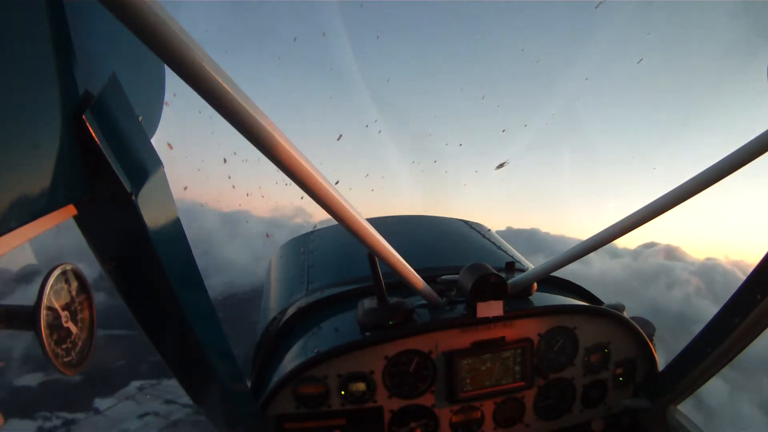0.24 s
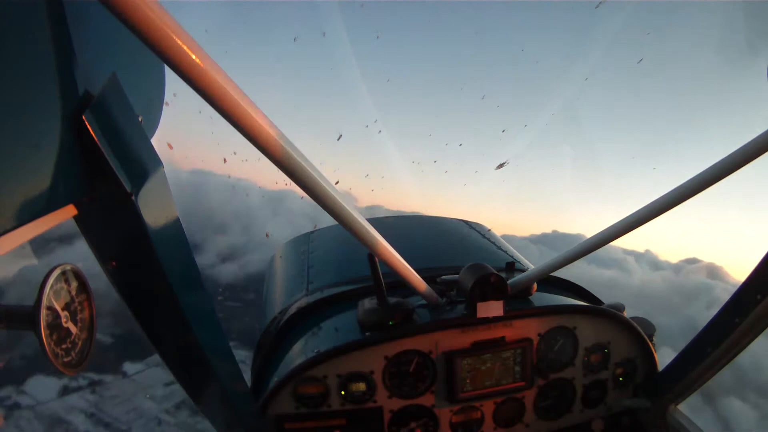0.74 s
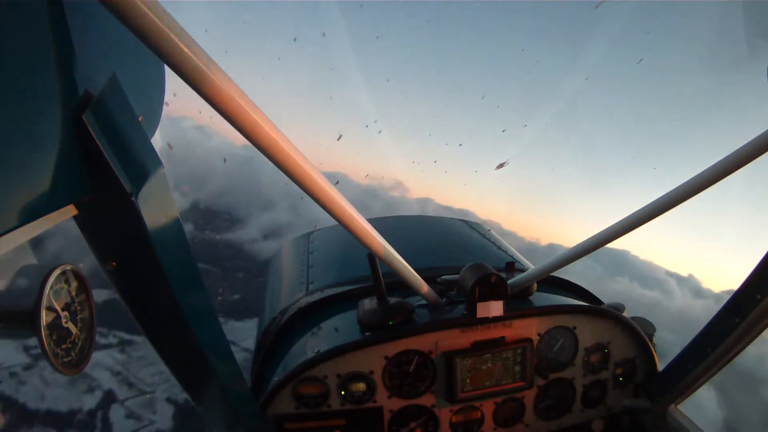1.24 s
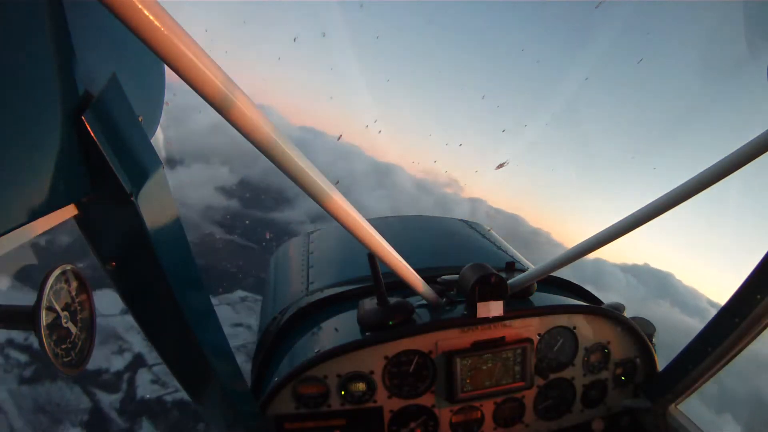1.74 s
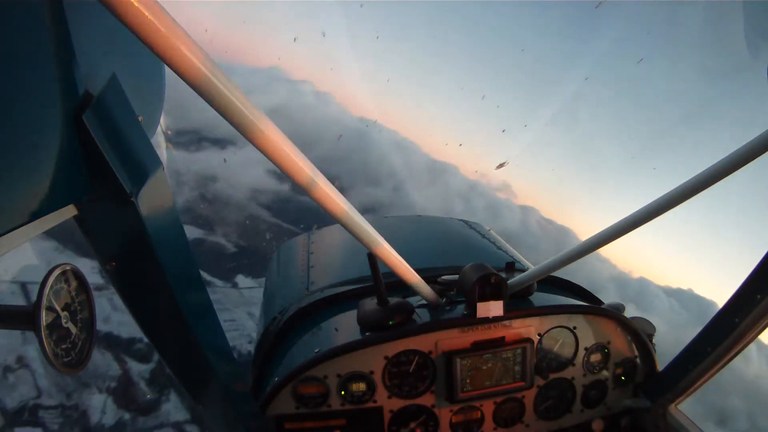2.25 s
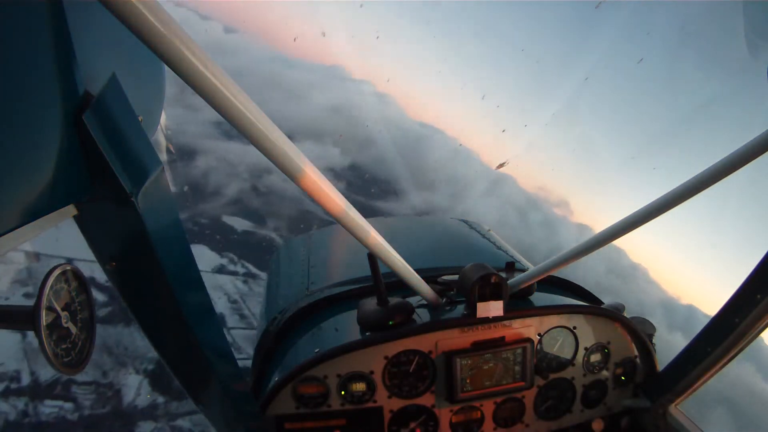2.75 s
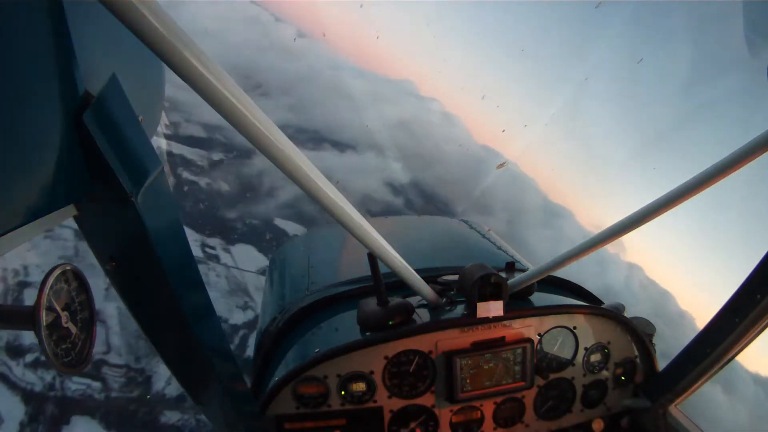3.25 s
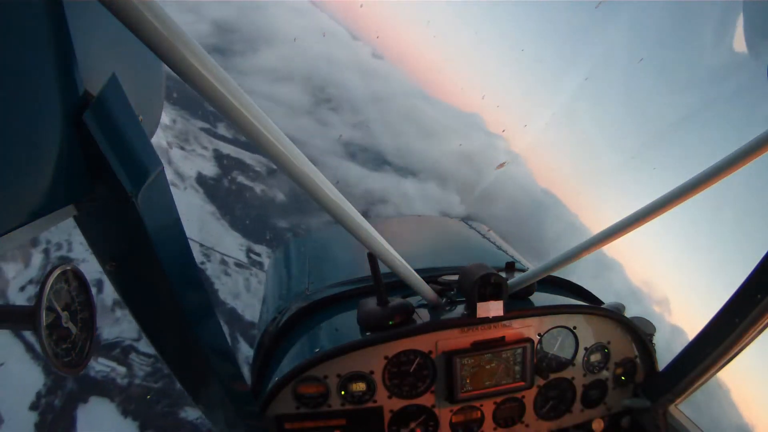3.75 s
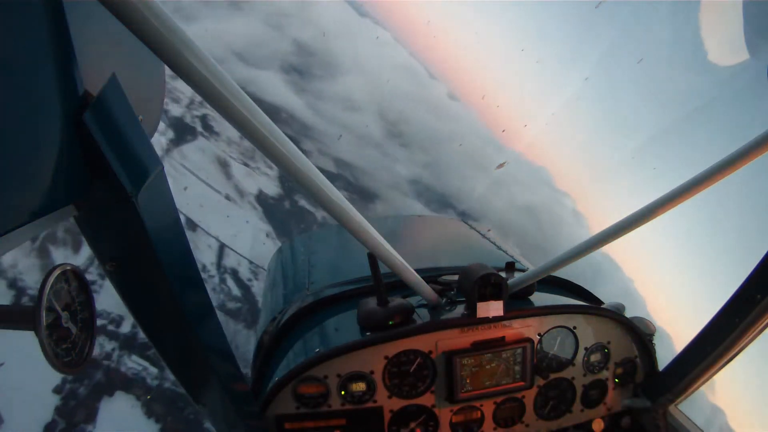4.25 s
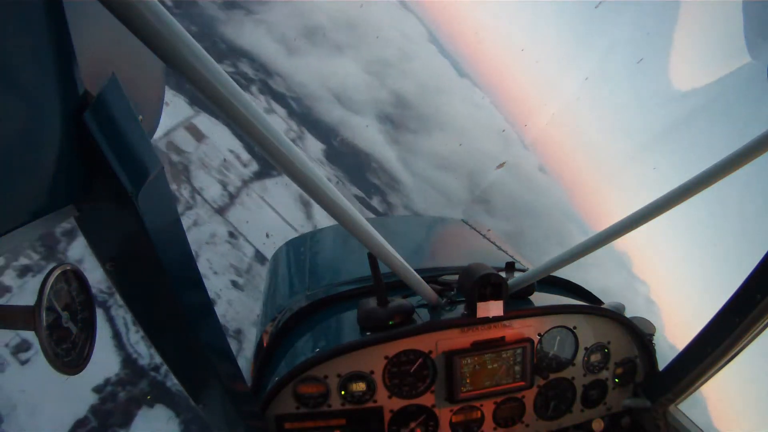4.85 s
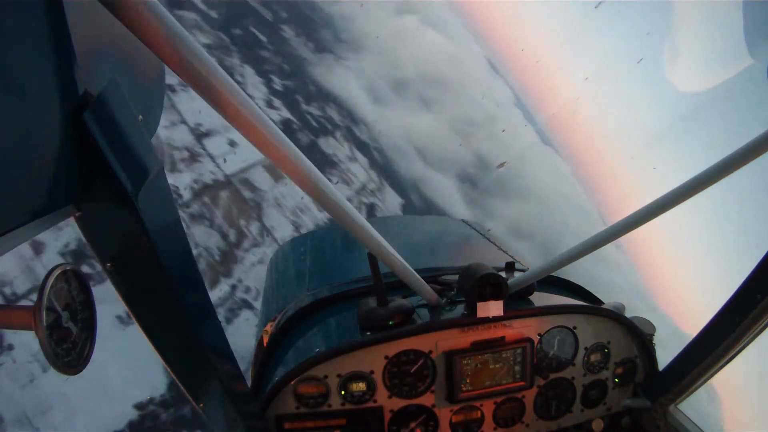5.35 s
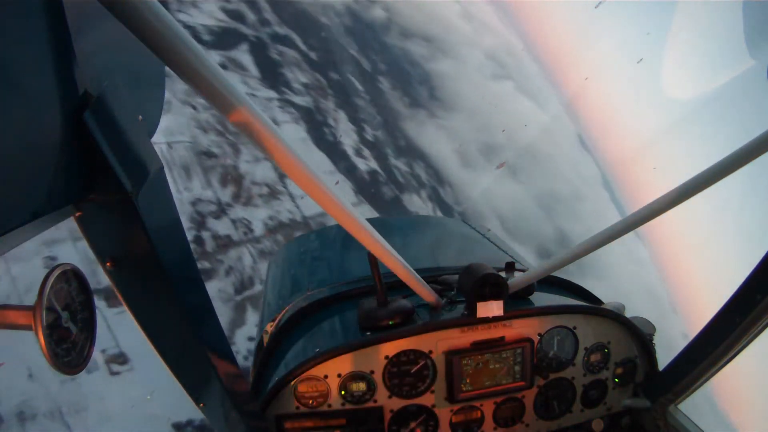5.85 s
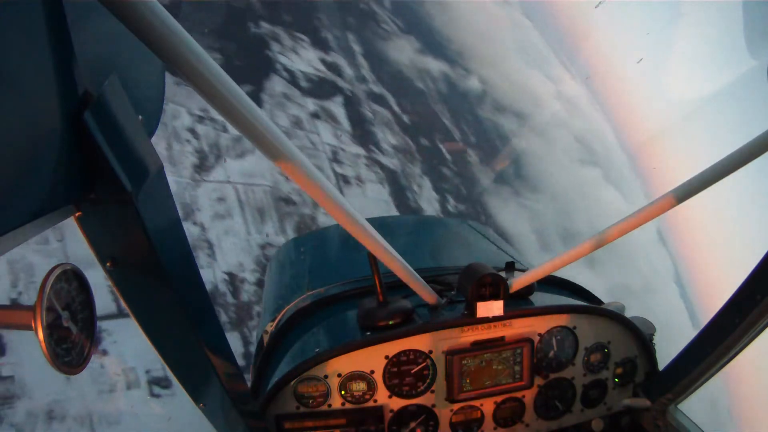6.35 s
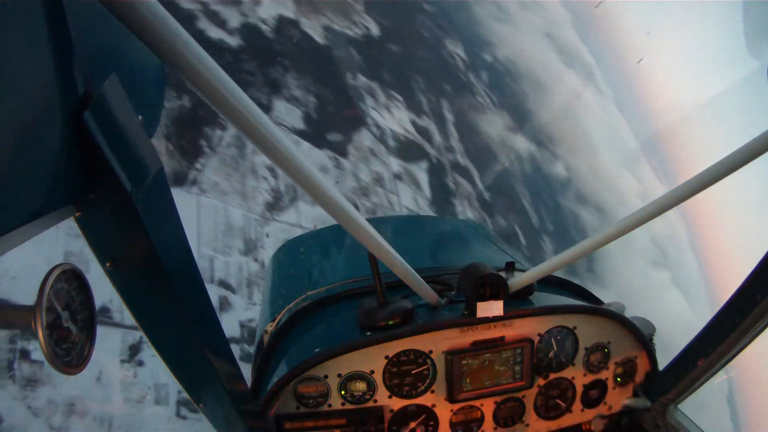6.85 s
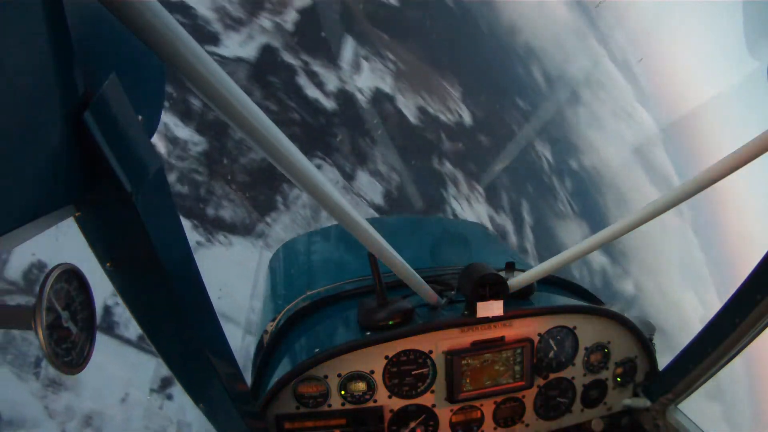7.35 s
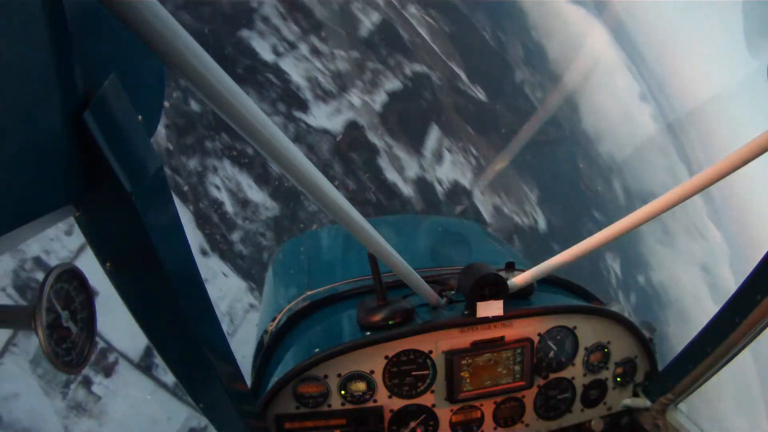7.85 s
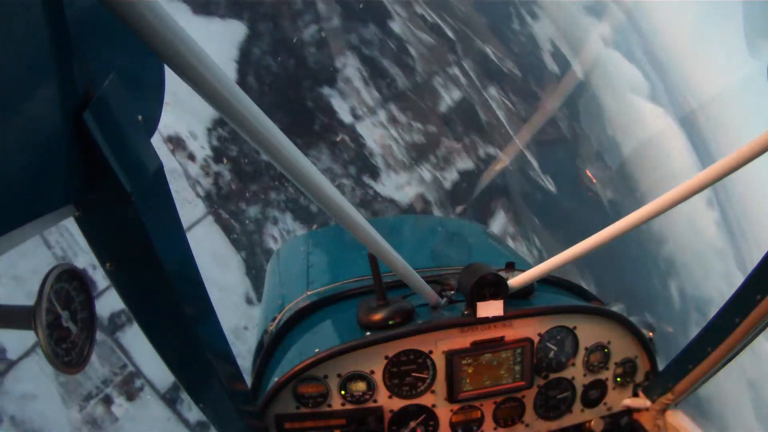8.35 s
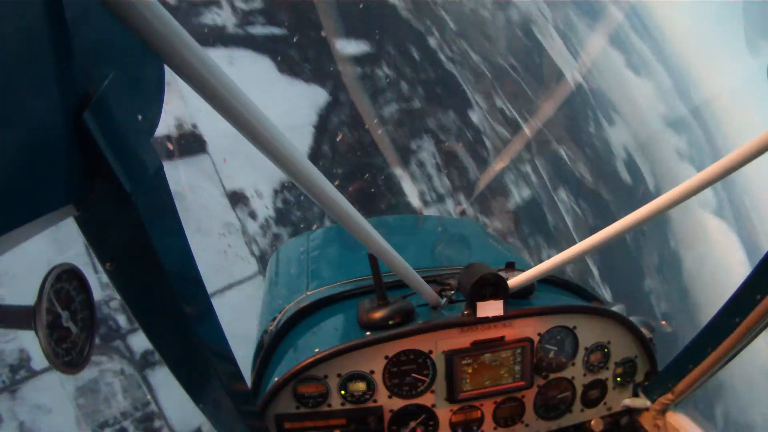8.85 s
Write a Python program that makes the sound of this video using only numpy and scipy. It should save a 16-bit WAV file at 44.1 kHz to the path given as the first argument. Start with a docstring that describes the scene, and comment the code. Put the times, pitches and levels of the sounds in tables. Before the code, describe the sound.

Cockpit interior of a light aircraft: throttled-back propeller throb sags amid knocks and gusty wind rumble, then steadily climbs in pitch with airspeed.

```python
"""Light plane in a diving turn

Inside the cockpit, engine throttled back: the propeller slows, then winds up again with the airspeed.
Its drone is a sum of sines locked to the blade phase; once per blade pass the drive knocks, a loose
fitting buzzes and two valve ticks sound, all as short noise bursts through resonant filters.
Shaped noise makes the air over the cabin and the leak; cabin resonances colour all but the leak,
the deep throb, the fitting's buzz and the whistle, and a brief hum swells early on."""
import sys
import numpy as np
from scipy import signal
from scipy.fft import rfft, irfft, next_fast_len
from scipy.io import wavfile
from scipy.ndimage import uniform_filter1d

SR = 44100
rng = np.random.default_rng(int(sys.argv[2]) if len(sys.argv) > 2 else 0)


def log_audio(samples):
    """Write samples as a 16-bit WAV file to the path given in sys.argv[1]."""
    # one column per channel
    frames = np.atleast_2d(samples).T
    # limit to full scale, then quantise
    limited = np.clip(frames, -1, 1)
    pcm = np.round(limited * 32767).astype(np.int16)
    wavfile.write(sys.argv[1], SR, pcm)


N = 401751
TIME = np.arange(N) / SR

# the propeller slows with the throttle closed, then winds up in the dive: (time [s], blade-pass rate [Hz])
BLADE_RATE = [(0.0, 32.41), (0.5, 32.1), (1.0, 29.58), (1.5, 26.08), (1.8, 25.71), (2.3, 25.36),
              (2.8, 24.77), (3.3, 24.5), (4.0, 24.8), (4.7, 25.28), (5.2, 26.17), (5.8, 26.85), (6.3, 28.0),
              (7.1, 29.45), (8.0, 32.13), (9.11, 35.77)]
# strength of the turbulence around the cabin, which drives the air noise: (time [s], level [dB])
FLOW = [(0.0, -8), (0.26, -6), (0.58, -9.2), (1.0, -8.5), (1.28, -3), (1.56, 4), (1.7, 0), (1.84, 4.5),
        (2.18, -3), (2.54, 1.5), (2.62, -0.7), (3.28, 3.5), (3.66, 1.45), (4.9, 0.4), (5.04, 3),
        (5.64, 3.5), (5.88, -1), (6.02, 3.5), (7.44, -1.5), (7.6, -0.5), (7.74, -4.5), (9.1, -3.5)]


def engine(blade_phase, waver_db=2.5, load_db_per_order=0.0522):
    """Harmonic synthesis: a throb grows with blade speed; orders above swell on crossing cabin resonances."""
    # drone before the cabin; the geared engine adds thirds between the blade orders:
    # (multiple of the blade rate, rounded to exact thirds below [1], level [dB])
    orders = [(2, -64), (2.67, -73.5), (3, -62), (3.33, -68), (3.67, -69), (4, -62), (5, -61), (6, -62),
              (7, -57), (8, -57), (8.33, -63), (9, -56.5), (9.33, -58.5), (10, -60)]
    throb_db, reference_hz = -55.5, 34
    throb_db_per_octave, drone_db_per_octave = 16.5, 7.5
    slowing_db = -0.85  # the drone sinks by this per Hz lost each second
    blade_hz, = follow(BLADE_RATE)
    octaves = np.log2(blade_hz / reference_hz)
    out = gain_of(throb_db + throb_db_per_octave * octaves) * np.sin(2 * np.pi * blade_phase)
    drive_db = drone_db_per_octave * octaves + slowing_db * slowing()
    # the high orders follow the turbulence most
    load_db = load_db_per_order * follow(FLOW)[0]
    hz = np.arange(SR // 100)
    lift_db = resonances_db(hz)
    for order, db in orders:
        multiple = round(3 * order) / 3
        cabin_lift_db = np.interp(multiple * blade_hz, hz, lift_db)
        level_db = db + drive_db + multiple * load_db + cabin_lift_db + waver_db * wander(0.69)
        out += gain_of(level_db) * np.sin(2 * np.pi * (multiple * blade_phase + rng.random()))
    return np.sqrt(2) * out  # sine levels are rms


def clatter(blade_phase, spread_db=5.25, steady_hardness=0.38, jitter_s=0.00294):
    """Periodic impacts: a light knock per blade pass, save close to a placed one; hardness brightens it."""
    # knocks of the drive placed one by one, faint to loud: (time [s], blow level [dB], hardness [0-1])
    placed_knocks = [(.031, -52, 0.07), (.118, -52, 0.04), (.241, -47.5, 0.23), (.28, -48, .05),
                     (.365, -50, 0.05), (.428, -51.5, 0.17), (.492, -53, .1), (.529, -48.5, 0.23),
                     (.559, -51.5, 0.12), (.649, -44, 0.6), (0.676, -48, 0.45), (0.781, -45, 0.37),
                     (.873, -52, 0.04), (0.94, -43.5, 0.75), (.978, -44.5, 0.37), (1.048, -44.5, .7),
                     (1.081, -46, 0.16), (1.118, -38, 0.3), (1.15, -40, 0.46), (1.185, -47, 0.7),
                     (1.193, -34, 0.96), (1.233, -41, 0.2), (1.258, -37, 0.6), (1.269, -42, 0.6),
                     (1.303, -42, 0.1), (1.333, -27.5, 0.9), (1.368, -46, 0.06), (1.4, -30, 0.57),
                     (1.434, -35.5, 0.37), (1.479, -34, 0.46), (1.509, -31.5, 0.37), (1.516, -35, 1),
                     (1.551, -36, 0.54), (1.578, -44, 0.3), (1.703, -46, 0.13), (1.75, -37, 0.4),
                     (1.788, -43, 0.02), (1.829, -35, 0.1), (1.866, -35.5, 0.1), (1.915, -41.5, 0.03),
                     (1.98, -33, 0.74), (2.02, -40, 0.02), (2.053, -43.5, 0), (2.247, -46.5, 0.15),
                     (2.289, -35.5, 0.45), (2.33, -37, 0.26), (2.368, -43, 0.3), (2.412, -39, 0.3),
                     (2.455, -42, 0.17), (2.493, -34.5, 0.18), (2.543, -44.5, 0.04), (2.578, -43, 0.3),
                     (2.752, -49, 0), (2.815, -44.5, 0), (2.863, -37, 0.12), (2.901, -41, 0.2),
                     (2.946, -42.5, 0.4), (2.982, -45, 0), (3.028, -42, 0.01), (3.097, -42, 0.13),
                     (3.145, -38.5, 0.05), (3.188, -38.5, 0.04), (3.228, -45, 0.03), (3.265, -35.5, 0.3),
                     (3.308, -40, 0.12), (3.54, -49, 0.13), (3.78, -50, .1), (3.845, -50, 0),
                     (3.925, -47, 0.07), (4.135, -42, 0.5), (4.221, -45, 0.2), (4.267, -42.5, 0.17),
                     (4.985, -46.5, .1), (5.127, -44, 0.17), (5.295, -42.5, 0.65), (5.373, -41.5, 0.7),
                     (5.529, -41.5, 0.8), (5.681, -43, 0.5), (5.98, -39.5, 0.6), (6.024, -37, 0.5),
                     (6.452, -43, .4), (6.604, -50, 0.1)]
    # mean blow of the ordinary knock: (time [s], level [dB])
    light_blow = [(0, -52.5), (.6, -60), (1.0, -54), (1.3, -46.5), (1.9, -46.5), (2.2, -54), (2.5, -45.5),
                  (3.25, -49), (3.6, -49.5), (4.3, -52.5), (5.4, -55), (6.4, -50), (7.3, -64), (9.11, -66)]
    # force of a knock: (frequency [Hz], relative density [dB per Hz])
    blow_force = [(60, -2), (330, 5.5), (600, -3), (1200, -3), (1550, -12.5), (2100, -2.5), (2650, -14),
                  (3350, 3.5), (4100, -13.5), (5000, -8.5), (5300, -27.5), (6700, -22), (7500, -47),
                  (13000, -69)]
    # panel thump under a knock: (frequency [Hz], relative density [dB per Hz])
    panel_force = [(60, -25), (150, -14), (240, -5), (320, 15), (480, -3.5), (600, -7.5), (850, -11),
                   (1400, -31), (2300, -31.5), (3000, -42.5), (6000, -60)]
    slowing_hardness = 0.064  # gained per Hz lost each second
    dive_hardness = 0.24  # gained at full airspeed
    out = np.zeros(N)
    rings = cabin_ring(blow_force), cabin_ring(panel_force)
    for s, blow_db, hardness in placed_knocks:
        add(out, s, knock(rings, blow_db, hardness))
    placed_times = np.transpose(placed_knocks)[0]
    random_range = steady_hardness + slowing_hardness * slowing()
    diving = dive_hardness * airspeed()
    for i in each_pass(blade_phase):
        late, strong = rng.uniform(-1, 1, 2)
        blow_db = follow(light_blow, TIME[i])[0] + spread_db * strong
        light = knock(rings, blow_db, random_range[i] * rng.random() + diving[i])
        if abs(placed_times - TIME[i]).min() > .022:
            add(out, TIME[i] + jitter_s * late, light)
    return out


def knock(rings, blow_db, hardness, thump_db=6.0, soft_hz=2500):
    """Impact excitation: a hard blow is bright and dry; a soft one is dull, with more chatter and thump."""
    out = np.zeros(SR // 8)
    hardness = np.clip(hardness, 0, 1)
    # soft chatter lies just under the blow; a fully hard knock leaves 26.5 dB less
    chatter_db = blow_db - 1.05 - 26.5 * hardness
    hard = burst(rings[0], decay=0.005, scatter=0.67)
    soft = signal.filtfilt(*signal.butter(1, soft_hz, fs=SR), hard, padlen=0)
    blow = hardness * hard + (1 - hardness) * np.sqrt(2) * soft
    add(out, 0, gain_of(blow_db) * blow)
    add(out, .001, gain_of(chatter_db) * buzz(settle_s=0.0096, contacts_per_s=900))
    add(out, 0, gain_of(chatter_db + thump_db) * thump(rings[1]))
    return out


def buzz(settle_s, contacts_per_s, rebound=0.54, detune=0.0091, uneven_db=3.0, dull_hz=4800, size=2400):
    """Modal synthesis: decaying rebounds excite a loose fitting's damped modes, varied each time."""
    # modes of the loose fitting: (frequency [Hz], level [dB], 60 dB decay time [s])
    modes = [(3603, 12, 0.046), (3640, 1, 0.038), (3860, 5.5, 0.039), (2870, -3, 0.05), (2110, 5.5, 0.023),
             (1774, 10, .02)]
    t = np.arange(size) / SR
    pitch = 1 + detune * rng.standard_normal()
    ring = np.zeros(size)
    for f, db, t60 in modes:
        envelope = gain_of(db + uneven_db * rng.standard_normal() - 60 * t / t60)
        ring += envelope * np.sin(2 * np.pi * f * pitch * t)
    # a weak steady rub with random stronger contacts
    touching = 0.069 + (rng.random(size) < contacts_per_s / SR)
    contacts = rebound * rng.standard_normal(size) * touching
    contacts[0] = 1
    sound = signal.fftconvolve(contacts * np.exp(-t / settle_s), ring)
    sound = signal.lfilter(*signal.butter(5, dull_hz, fs=SR), sound)
    return sound / np.sqrt(np.mean(sound[:size // 5] ** 2))


def thump(ring, rise=0.0074, size=1800):
    """Forced vibration: the panels shudder as noise that peaks after the rise time [s], then decays."""
    t = np.arange(size) / SR
    sound = signal.fftconvolve(rng.standard_normal(size) * t * np.exp(-t / rise), ring)
    return sound / np.sqrt(np.mean(sound[:size // 2] ** 2))


def valves(blade_phase, spread_db=2.2, jitter_s=.0008):
    """Phase-locked impacts: the valve gear ticks near two fixed places in every blade cycle."""
    # the two ticks: (place in the blade cycle [0-1], relative level [dB])
    places = [(.36, -4.5), (.65, -4.5)]
    # shared level of the ticks: (time [s], level [dB])
    tick_level = [(0, -61.5), (1, -59.5), (2.2, -51), (3.1, -51), (3.6, -47), (4.3, -47.5), (5.1, -50.5),
                  (5.9, -52.5), (6.6, -51), (7.5, -60), (9.1, -64)]
    # spectrum of a tick: (frequency [Hz], relative density [dB per Hz])
    tick_colour = [(300, -21.5), (1200, -5), (2100, -7), (2600, -4.5), (3000, 4.5), (3800, -2.5),
                   (4300, -9.5), (4900, -4), (5400, -23), (6700, -23), (9000, -38), (13000, -52.5)]
    out, ring = np.zeros(N), cabin_ring(tick_colour)
    for place, db in places:
        for s in TIME[each_pass(blade_phase - place)]:
            late, strong = rng.standard_normal(2)
            level_db = follow(tick_level, s)[0] + db + spread_db * strong
            add(out, s + jitter_s * late, gain_of(level_db) * burst(ring, decay=.0036, scatter=0.77))
    return out


def tick():
    """Impulse response: something small clicks once, brightly, in the cockpit."""
    # spectrum of the click: (frequency [Hz], relative density [dB per Hz])
    click_colour = [(300, 0), (2000, -3), (3700, 1), (6000, -21), (10500, -20), (13000, -41)]
    at_s, level_db = 7.279, -44
    out = np.zeros(N)
    add(out, at_s, gain_of(level_db) * burst(cabin_ring(click_colour), decay=0.0059, scatter=0.64))
    return out


def air(blade_phase, rumble_growth=0.2, gust_db=0.86, grain_db=1.0, chop_db=1.0):
    """Turbulent boundary-layer noise, partly chopped by propeller wash; airspeed tilts it from rush to hiss."""
    # smooth slope of the air noise: (frequency [Hz], relative density [dB per Hz])
    air_slope = [(22, -34.5), (32, -16.5), (42, 3.5), (58, -19), (100, -8.5), (130, -4), (220, 2),
                 (330, -1), (480, -2.5), (580, -13), (850, -14), (2300, -24.5), (3800, -26), (6200, -43.5),
                 (9000, -49), (14500, -62.5)]
    # the cabin's boom, air noise in its main resonance, before its trim: (time [s], level [dB])
    boom_level = [(0, -48), (.25, -43), (.55, -48), (1.08, -45), (1.57, -33), (1.72, -40.5), (1.85, -33.5),
                  (2.2, -44), (2.52, -35.5), (2.7, -39), (3.1, -34.5), (3.4, -34.5), (3.55, -33),
                  (3.75, -41.5), (4.05, -41), (4.2, -36), (4.37, -45), (4.55, -39), (5.35, -34),
                  (5.85, -38), (6.03, -33), (6.6, -37.5), (6.75, -32), (6.95, -40), (7.4, -45.5),
                  (7.6, -37.5), (7.85, -44), (8.2, -39), (8.65, -44), (9.1, -38)]
    boom_trim_db = -1.5  # leaves room for the drone
    body_db = -5.5  # relative to the buffeting
    hz = np.fft.rfftfreq(N, 1 / SR)
    noise = rfft(rng.standard_normal(N)) * gain_of(cabin_db(air_slope, hz))
    flow_db, = follow(FLOW)
    speed = airspeed()
    # level at 0 dB turbulence before the dive, and the change at full speed [dB]
    buffet = -36 + flow_db - 2 * speed
    rush = -47 + flow_db - 2 * speed
    hiss = -77.5 + flow_db + 1 * speed
    # smooth high-pass shares, whose differences split the noise into bands
    above = [1 / (1 + (f / (hz + 1)) ** 12) for f in (195, 290, 560, 5200)]

    def band(share, low_hz, high_hz):
        """Spectral normalization: a share of the noise, scaled so the whole has rms 1 between two limits."""
        reference = irfft(noise * (hz > low_hz) * (hz < high_hz), N)
        return irfft(noise * share, N) / reference.std()

    rumble = band(1 - above[0], 130, 550)
    boom = steadied(irfft(noise * (above[0] - above[1]), N))
    body = steadied(irfft(noise * (above[1] - above[2]), N))
    roar = band(above[2] - above[3], 600, 2500)
    fizz = band(above[3], 7500, 12000)
    flutter = gust_db * wander(32)
    chop = -chop_db * np.cos(2 * np.pi * blade_phase)
    # the large eddies of the rumble answer slowly and also share some of the hiss's rise and fall
    eddies = uniform_filter1d(buffet + rumble_growth * (hiss - np.median(hiss)), SR // 2)
    return (rumble * gain_of(eddies)
            + boom * gain_of(follow(boom_level)[0] + boom_trim_db + flutter + chop)
            + body * gain_of(buffet + body_db + flutter + chop)
            + roar * gain_of(rush + flutter + grain_db * wander(160))
            + fizz * gain_of(hiss + .5 * flutter))


def leak():
    """Jet noise: a smooth draught through the door seals, past the cabin's resonances, grows in the dive."""
    # spectrum of the draught: (frequency [Hz], relative density [dB per Hz])
    leak_slope = [(300, -20), (1000, -1), (2600, -9.5), (4100, -2.5), (5500, -23.5), (9000, -34),
                  (14500, -58.5)]
    full_speed_db, growth_db = -65, 9.5
    hz = np.fft.rfftfreq(N, 1 / SR)
    noise = irfft(rfft(rng.standard_normal(N)) * gain_of(read(leak_slope, hz)), N)
    return evened(noise) * gain_of(full_speed_db + growth_db * (airspeed() - 1))


def hum():
    """Resonance: the cabin's main mode swells into a brief tone."""
    # (time [s], frequency [Hz], rms level [dB])
    hum_curve = [(.915, 244, -76), (.945, 254.5, -37), (.985, 239, -37.5), (1.0, 235, -48)]
    return tone(hum_curve)


def whistle(width_hz=110):
    """Narrow-band modulation: slow noise times a rising sine makes the fuzzy tone of air at a seam."""
    # (time [s], frequency [Hz], rms level [dB])
    seam_tone = [(4.1, 10650, -103), (4.7, 10780, -95), (5.25, 10900, -96), (5.4, 11650, -92),
                 (5.65, 11820, -90), (6.0, 11900, -92), (6.6, 11950, -102)]
    return wander(width_hz) * tone(seam_tone)


def slowing():
    """Deceleration: the propeller's smoothed loss of blade rate [Hz per second], zero while it gains."""
    change = np.gradient(follow(BLADE_RATE)[0]) * SR
    return np.maximum(-uniform_filter1d(change, SR // 4), 0)


def airspeed():
    """Linear acceleration: how far the dive has brought the plane to full speed [0-1]."""
    from_s, to_s = 0.97, 6.3
    return np.clip((TIME - from_s) / (to_s - from_s), 0, 1)


def each_pass(blade_phase):
    """Phase wrapping: the samples at which a new blade cycle begins."""
    return np.flatnonzero(np.diff(np.floor(blade_phase)) > 0)


def resonances_db(hz):
    """Modal gain: how much the cabin's Gaussian resonance peaks lift each frequency."""
    # cabin resonances: (frequency [Hz], width [Hz], lift [dB])
    cabin_modes = [(76, 8.8, 4), (131.3, 23, 4.5), (149, 4.3, 1), (180, 19.4, 6), (235.8, 14.4, 5.5),
                   (237.7, 51, 6.5), (370, 48, 2), (445.5, 73, 7.5), (497.8, 25.3, 7.5), (731, 99, 5.5),
                   (874, 79, 6), (997, 31, 1.5), (1193, 110, 7.5), (1444, 81, 8), (1752, 126, 8.5),
                   (2102, 133, 9.5), (2299, 70, 8), (2640, 230, -4), (2933, 110, 7), (3150, 170, 4.5),
                   (3437, 76, 6.5), (3917, 200, 7.5), (4600, 67, 6), (4920, 95, 6), (5660, 450, 5),
                   (7240, 860, 3.5), (8509, 550, 5)]
    return sum(db * np.exp(-2 * ((hz - f) / width) ** 2) for f, width, db in cabin_modes)


def cabin_db(slope, hz):
    """Source-filter principle: a source spectrum with the cabin's resonances on top."""
    return read(slope, hz) + resonances_db(hz)


def cabin_ring(slope, size=4096):
    """Minimum phase: the cabin's causal answer to one click, faded out at its end."""
    log_gain = np.log(gain_of(cabin_db(slope, abs(np.fft.fftfreq(size, 1 / SR)))))
    # the Hilbert transform of the log gain gives the causal phase
    ring = np.fft.ifft(np.exp(np.conj(signal.hilbert(log_gain)))).real
    return ring[:size // 2] * signal.windows.tukey(size, .5)[size // 2:]


def burst(ring, decay, scatter, size=1024):
    """Impulsive excitation: three contacts and decaying noise rebounds; rms 1 over the first milliseconds."""
    t = np.arange(size) / SR
    force = scatter * rng.standard_normal(size) * np.exp(-t / decay)
    force[rng.integers(0, size // 6, 3)] += rng.choice([-1, 1], 3)
    sound = signal.fftconvolve(force, ring)
    return sound / np.sqrt(np.mean(sound[:size // 3] ** 2))


def tone(rows):
    """Phase integration: a sine on a curve of time, frequency and rms level, silent outside it."""
    hz, db = follow(rows)
    sounding = (TIME > rows[0][0]) & (TIME < rows[-1][0])
    return np.sqrt(2) * sounding * gain_of(db) * np.sin(2 * np.pi * np.cumsum(hz) / SR)


def wander(hz):
    """Low-pass noise: smooth chance of rms 1 with a Gaussian roll-off around hz."""
    size = next_fast_len(N, True)
    roll_off = np.exp(-(np.fft.rfftfreq(size, 1 / SR) / hz) ** 2)
    return evened(irfft(rfft(rng.standard_normal(size)) * roll_off, size)[:N])


def steadied(x, window_s=0.38):
    """Envelope division: noise of rms 1 with its slow chance surges levelled out."""
    size = round(window_s * SR)
    power = uniform_filter1d(uniform_filter1d(x ** 2, size), size)
    return evened(x / np.sqrt(abs(power) + 1e-20))


def evened(x):
    """Power normalization: scales to rms 1."""
    return x / np.sqrt(np.mean(x ** 2) + 1e-20)


def gain_of(db):
    """Logarithmic level: decibels to amplitude."""
    return 10 ** (np.asarray(db) / 20)


def follow(rows, t=TIME):
    """Linear interpolation: the columns of a curve table at the times t."""
    s, *columns = np.transpose(rows)
    return [np.interp(t, s, c) for c in columns]


def read(points, hz):
    """Logarithmic interpolation: a spectrum table on a log-frequency axis."""
    f, value = np.transpose(points)
    return np.interp(np.log(hz + 1), np.log(f + 1), value)


def add(mix, s, sound):
    """Superposition: mixes a sound in at time s."""
    part = mix[max(0, round(s * SR)):][:len(sound)]
    part += sound[:len(part)]


def scene():
    """Superposition: everything driven by the propeller's phase, and the air around it."""
    blade_phase = np.cumsum(follow(BLADE_RATE)[0]) / SR  # in blade cycles
    machinery = engine(blade_phase) + clatter(blade_phase) + valves(blade_phase) + tick()
    surroundings = air(blade_phase) + leak() + hum() + whistle()
    return (machinery + surroundings)[None]


def record(dry):
    """Band limiting: a linear-phase low-pass at 15 kHz."""
    low_pass = signal.firwin(511, 15000, window=("kaiser", 9), fs=SR)
    return signal.oaconvolve(dry, low_pass[None], "same")


dry = scene()
out = record(dry)
log_audio(out)
```